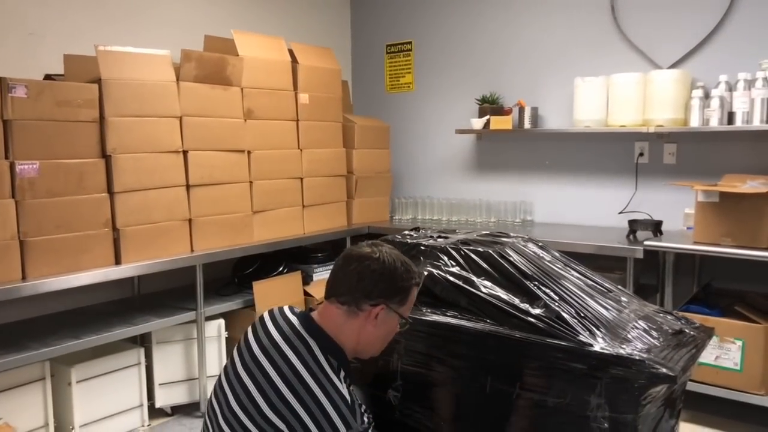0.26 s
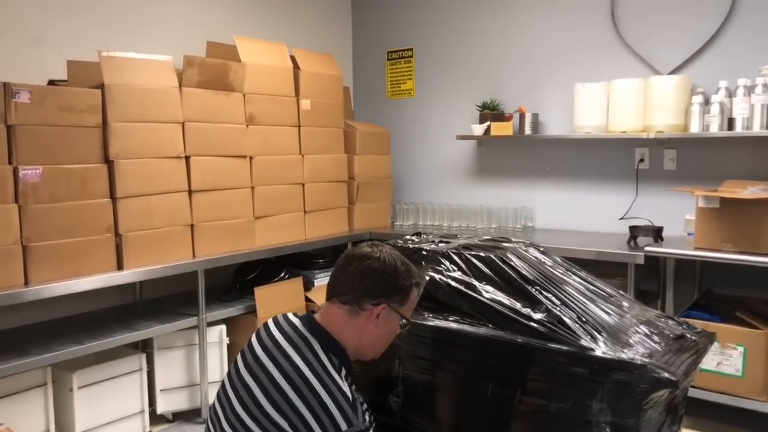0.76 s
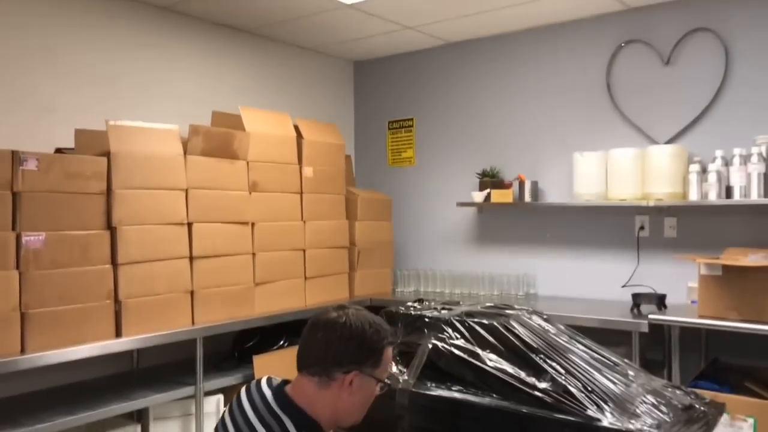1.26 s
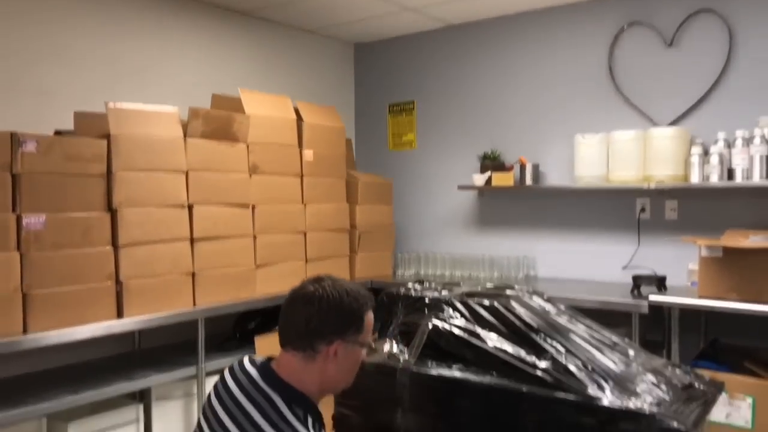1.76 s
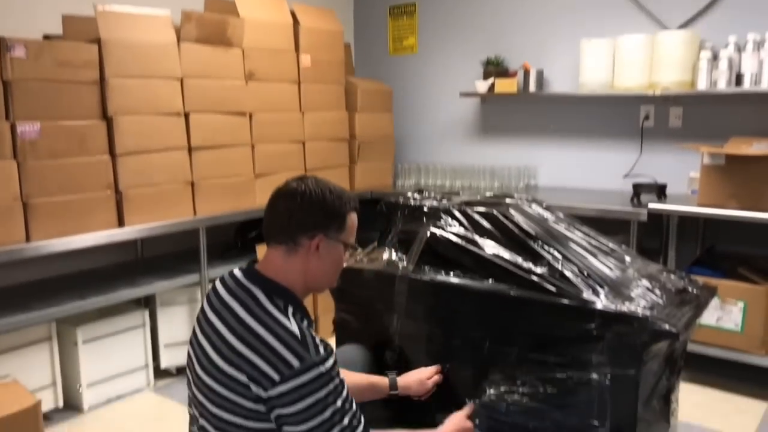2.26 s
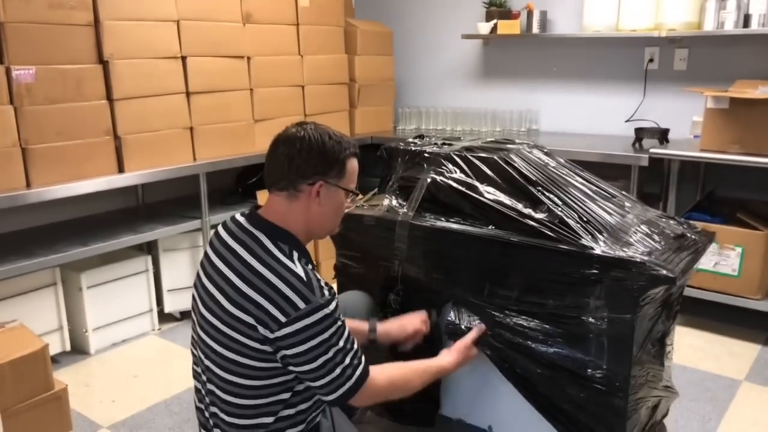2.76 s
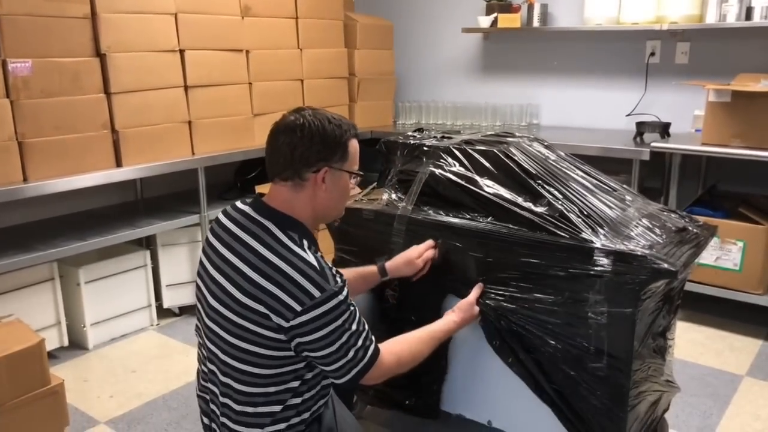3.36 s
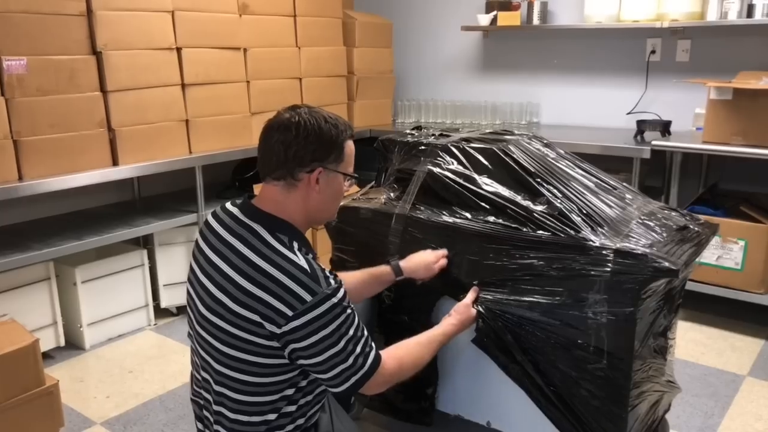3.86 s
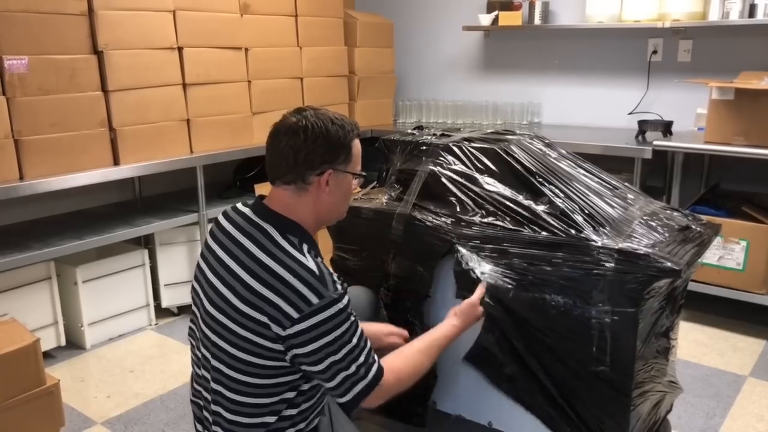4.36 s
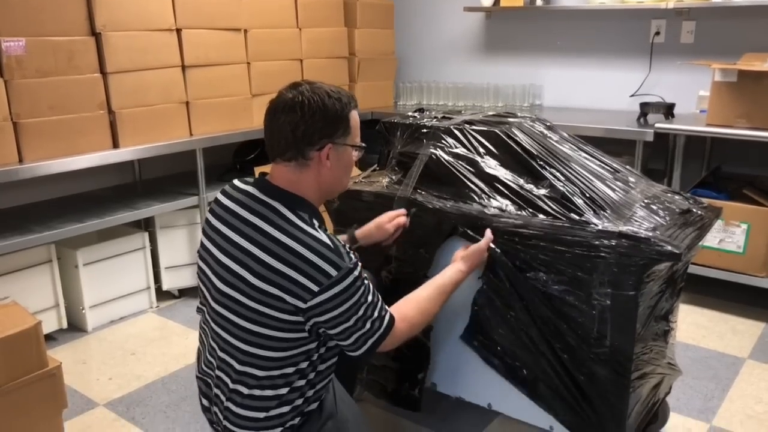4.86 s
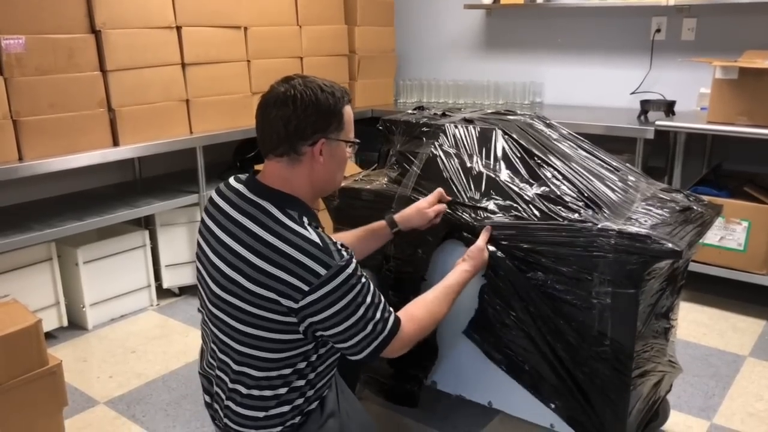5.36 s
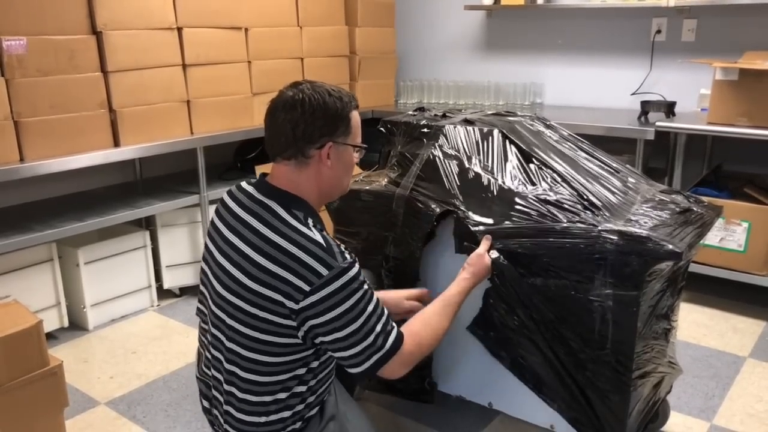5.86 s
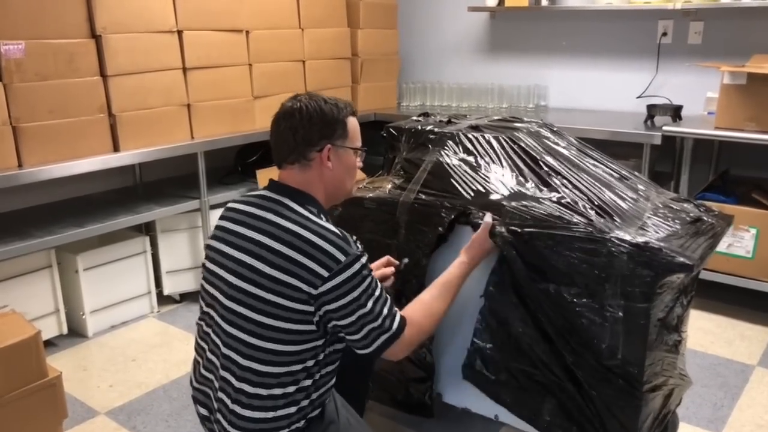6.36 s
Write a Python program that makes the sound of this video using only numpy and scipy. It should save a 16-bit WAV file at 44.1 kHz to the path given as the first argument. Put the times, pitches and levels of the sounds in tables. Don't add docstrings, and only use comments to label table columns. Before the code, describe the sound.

Taut plastic stretch wrap is pulled and torn by hand with sharp irregular snaps, dry crinkling and hollow knocks, over a low cooler hum.

```python
import sys
import numpy as np
from scipy import signal
from scipy.fft import rfft, irfft, next_fast_len
from scipy.io import wavfile
from scipy.ndimage import map_coordinates

SR = 44100
rng = np.random.default_rng(int(sys.argv[2]) if len(sys.argv) > 2 else 0)


def log_audio(samples):
    frames = np.atleast_2d(samples).T
    limited = np.clip(frames, -1, 1)
    pcm = np.round(limited * 32767).astype(np.int16)
    wavfile.write(sys.argv[1], SR, pcm)


def gain_from_db(level_db):
    decades = np.asarray(level_db, float) / 20
    return 10 ** decades


N = 291501

# t/s, peak level/dB, knock on load/dB, slap/dB
TAUT_SNAPS = [(0.362, -16.5, -19, -6.5), (0.4017, -11, -24, -12), (0.435, -7, -19.5, -9),
              (0.4398, -4.5, -20.5, -15), (0.471, -10.5, -17.5, -9), (0.486, -3.5, -15.5, -13.5),
              (0.5465, -9, -19, -13.5), (0.5624, -10.5, -15, -20), (0.6256, -8.5, -19.5, -15),
              (0.6557, -15, -35, -35), (0.9363, 3, -18, -15.5), (1.0195, -16, -27, -23.5),
              (2.4455, -17.5, -15.5, -13), (2.452, -17, -10, -12), (2.5105, -12.5, -9.5, -4.5),
              (2.561, -6.5, -16, -10.5), (2.5704, -12, -10.5, -12.5), (2.589, -8, -15, -14.5),
              (2.784, -16, -19.5, -15), (3.3721, -16, -19, -10), (4.2091, -9.5, -6.5, -14),
              (4.2211, -14.5, -10.5, -7.5), (4.7929, -4, -45, -17.5), (4.798, -15, -33, -18.5),
              (5.013, -12.5, -9, -6.5), (5.021, -29, -6.5, -18), (5.305, -19, -22, -9.5),
              (5.763, -13, -17, -16.5), (5.785, -11, -11.5, -26), (6.148, -16, -17, -6.5)]
# t/s, peak level/dB, knock on load/dB, slap/dB
SLACK_SLAPS = [(0.8897, -33, -8, -20.5), (1.612, -27, -10, -3.5), (1.86, -30, -0.5, -6),
               (1.9425, -24, -5, -18.5), (2.1245, -32, -6.5, -4.5), (2.417, -32.5, 5.85, -3),
               (2.4912, -9, -7, -2), (2.4991, -13, -6, -3.5), (2.727, -27, -9.5, -4),
               (2.5426, -20.5, -1, -13), (2.852, -24, -4.5, -3.5), (2.9, -20.5, -14.5, -24.5),
               (3.876, -29, -22.5, -0.5), (4.104, -21, 8, -3.5), (4.109, -31, 3.5, -10.5),
               (4.115, -20.5, -6, 0.5), (4.281, -31.5, 0, -10.5), (5.3448, -23.5, -10, -2),
               (6.101, -25, -13.5, 0.5)]
# t/s, peak level/dB, knock on load/dB
CREASE_TICKS = [(0.1132, -37.5, -14), (0.853, -38, -31), (0.82, -32, -36.5), (0.6184, -35.5, -28.5),
                (0.9231, -22.5, -31), (1.141, -34.5, -31), (1.2991, -36.5, -35.5), (1.318, -20, -48.5),
                (1.333, -21, -37.5), (1.4, -34.5, -26), (1.502, -35, -35), (1.641, -23, -19),
                (1.772, -20, -42), (1.835, -18.5, -38), (1.971, -25.5, -21), (1.996, -25.5, -27.5),
                (2.157, -22, -31), (2.302, -21.5, -11), (2.7102, -32.5, -31), (2.77, -23, -34),
                (3.361, -20, -14.5), (3.683, -27.5, -33), (3.749, -25, -24), (4.0698, -18, -11.5),
                (4.902, -22.5, -16), (4.9481, -17, -25), (5.157, -24, -17.5), (5.402, -18.5, -29),
                (5.67, -21.5, -10.5), (5.919, -16, -17.5)]
# t/s, peak level/dB, knock on load/dB
CLING_PEELS = [(0.692, -15, -15.5), (0.734, -17.5, -22.5), (1.2749, -23, -15.5), (1.485, -24.5, -36),
               (1.818, -25, -11), (2.255, -27, -20.5), (2.939, -19, -6.5), (3.2286, -25, -11.5),
               (3.264, -15, -43.5), (3.288, -15.5, -23), (4.174, -22, -5), (4.192, -12, -25.5),
               (4.616, -23.5, -23), (4.7451, -16.5, -24.5), (5.1253, -20, -8.5), (5.487, -21, -19.5),
               (5.62, -37, -21), (5.745, -13, -7.5), (5.7553, -18.5, -31.5), (5.866, -14.5, -18),
               (6.0809, -17.5, -10.5), (6.52, -16.5, -20.5), (6.567, -18, -23.5)]


def releases():
    events = [(*row, 0.002514) for row in TAUT_SNAPS]
    events += [(*row, 0.00267) for row in SLACK_SLAPS]
    for rows, base_slap_db, length_s in (CREASE_TICKS, -12.5, 0.00255), (CLING_PEELS, -14, 0.0086):
        for t_s, peak_db, knock_db in rows:
            slap_db = base_slap_db + 0.17 * (knock_db + 23)
            events.append((t_s, peak_db, knock_db, slap_db, length_s))
    return events


# f/Hz, level/dB per Hz
CREASE_COLOUR = [(1500, -27), (2800, -3.5), (4500, -1.5), (6500, -4), (8000, -21.5), (11000, -42)]
FOLD_COLOUR = [(500, -18.5), (1100, -2.5), (2000, 1.5), (2800, -3), (5000, -23.5)]
EDGE_COLOUR = [(5000, -10), (7500, -1.5), (10000, -8.5), (13000, -17), (15800, -48.5), (16500, -38.5)]
# f/Hz, width/Hz, level/dB
FREE_LOAD = [(195, 107, -3), (416.8, 50.2, 4.5), (613.2, 59.7, 5), (798.2, 143, 2.5), (1100, 650, -8)]
# f/Hz, width/Hz, level/dB
WRAPPED_LOAD = [(390, 89, -0.5), (804, 124, 1), (1019, 135, 0), (1630, 90, -22)]


def snaps():
    trains = np.zeros((4, N + SR))
    t = np.arange(SR // 16) / SR
    for start_s, peak_db, knock_db, slap_db, length_s in releases():
        edge_db = -17.5 - 0.273 * (peak_db + 20) - 0.059 * (knock_db + 20.5) - 0.198 * (slap_db + 7.5)
        rise_s = 0.0001 + 30 * length_s ** 2
        peak_db -= 8 * np.log10(length_s / 0.00255 + 0.67)
        spikes = gain_from_db(2.906 * rng.standard_normal(len(t) // 16 + 1)).repeat(16)[:len(t)]
        decay = np.exp(-(t / (length_s + 0.000099)) ** 0.948)
        shape = gain_from_db(peak_db) * decay * (1 - np.exp(-t / rise_s)) * spikes
        levels = gain_from_db([[0], [slap_db], [edge_db], [knock_db]])
        first = round(start_s * SR)
        trains[:, first:first + len(t)] += levels * shape * rng.standard_normal((4, len(t)))
    rip, slap, edge, blow = trains[:, :N]
    film = gain_from_db(-10.0) * coloured(rip, CREASE_COLOUR)
    film += gain_from_db(-1.48) * coloured(slap, FOLD_COLOUR)
    film += gain_from_db(2.0) * coloured(edge, EDGE_COLOUR)
    opened_s = 1.2
    wrapped = np.arange(N) < opened_s * SR
    free_knocks = gain_from_db(2.0) * hollow(blow * ~wrapped, FREE_LOAD)
    wrapped_knocks = gain_from_db(3) * hollow(blow * wrapped, WRAPPED_LOAD)
    return film + free_knocks + wrapped_knocks


# t/s, peak level/dB, f/Hz, t60/s
BUMPS = [(0.937, -32.5, 185.7, 0.2), (1.945, -29, 170.3, 0.075), (2.492, -29.5, 249, 0.084),
         (2.936, -32.5, 153.2, 0.095), (3.225, -28.5, 136, 0.0535), (4.106, -28.5, 405, 0.139),
         (4.259, -28, 149.6, 0.077), (5.012, -33, 179, 0.107), (5.752, -39.5, 241, 0.097),
         (5.775, -32.5, 150, 0.126), (6.088, -47.5, 213, 0.13), (6.446, -26, 226.7, 0.045)]


def thuds():
    out = np.zeros(N + SR)
    t = np.arange(SR // 2) / SR
    for start_s, peak_db, hz, t60_s in BUMPS:
        envelope = gain_from_db(peak_db - 60 * t / t60_s) * (1 - np.exp(-t / 0.0042))
        first = round(start_s * SR)
        out[first:first + len(t)] += envelope * np.sin(2 * np.pi * hz * t)
    return out[:N]


# t/s, crinkle level/dB
SHIFTING = [(0.0, -52), (0.07, -66), (0.34, -56.5), (1.2, -61), (1.62, -51.5), (1.82, -42.5), (2.08, -54.5),
            (2.45, -55), (2.95, -48), (3.2, -51), (3.72, -55.5), (4.1, -56), (4.4, -42.5), (4.6, -47),
            (4.95, -46), (5.42, -43), (5.62, -48), (6.61, -47.5)]
# t/s, drumming over crinkle/dB
LOAD_CONTACT = [(0, -5.5), (1.0, -10), (1.8, -7), (2.4, -8.5), (2.9, -4), (3.6, -12.5), (4.05, 6),
                (4.5, -9.5), (5.2, -8), (5.62, 2), (5.95, -15.5), (6.61, -15)]
# t of peak/s, crinkle level/dB, 10 dB fall/s (sign unused), drumming over crinkle/dB
HAND_TUGS = [(0.47, -47, -0.0243, 6.5), (0.69, -41.5, 0.0025, 1.05), (0.78, -49.5, 0.02, -27.5),
             (1.3, -43.5, 0.0764, -10), (1.335, -44.5, 0.09, -12), (1.49, -45, 0.05, -10),
             (2.41, -52.5, -0.03, 14), (2.57, -36, 0.1028, -19), (2.9, -47.5, 0.34, -11),
             (3.02, -48, 0.1254, -2.5), (3.29, -36.5, 0.0419, -10), (3.39, -42.5, 0.21, -8),
             (3.77, -50.5, -2.92, -8.5), (3.95, -48.5, 0.13, 7), (4.05, -55, 0.41, 12),
             (4.17, -46, 0.06, 11.5), (4.21, -36.5, 0.2777, -10.5), (4.63, -43.5, 0.29, -5),
             (4.72, -44.5, 0.17, -8.5), (5.17, -34.5, 0.0126, -5.5), (5.3, -42.5, 0.08, -0.5),
             (5.6, -52, -3.08, 4.5), (5.73, -49.5, -1.5, 0.5), (5.765, -31, 0.0559, 2.5),
             (5.87, -39.5, 0.2361, -11.5), (5.97, -48.5, 15.37, -18), (6.085, -38.5, -0.0936, -6),
             (6.155, -37, -0.02, -3.5), (6.37, -40.5, 0.1, -1), (6.56, -38, 10.72, -9)]
# t/s, crinkle level/dB, 10 dB fall/s (sign unused), drumming over crinkle/dB
SPRING_BACKS = [(0.37, -59, -0.87, -6.5), (0.553, -39, 0.0539, 2), (0.632, -39, 0.11, -15.5),
                (0.943, -31.5, 0.0657, -5.5), (1.62, -46.5, 0.386, -8.5), (2.13, -62.5, -3.75, -11.5),
                (2.262, -49, 0.3835, 6), (2.495, -37.5, 0.0419, 6), (2.78, -41, 0.2437, -6.5),
                (3.875, -44.5, 0.13, -1.5), (4.11, -46, 0.0845, 12.5), (4.803, -39, 0.0255, -2),
                (5.017, -41, 0.5165, -6)]


def handling():
    t = np.arange(N) / SR
    body = gain_from_db(2 * np.interp(t, *np.transpose(SHIFTING)))
    drum = body * gain_from_db(2 * np.interp(t, *np.transpose(LOAD_CONTACT)))
    for rows, rise_s in (HAND_TUGS, 0.0448), (SPRING_BACKS, 0.0084):
        for peak_s, level_db, fall_s, drum_db in rows:
            slope = np.maximum((peak_s - t) / rise_s, (t - peak_s) / abs(fall_s))
            power = gain_from_db(2 * level_db - 20 * slope)
            body = body + power
            drum = drum + power * gain_from_db(2 * drum_db)
    return 10 * np.log10(body), 10 * np.log10(drum)


# f/Hz, level/dB per Hz
DRUM_COLOUR = [(100, -54.5), (200, 0), (400, -5), (800, -3), (1200, 0), (2000, -21)]


def crinkle():
    body_db, drum_db = handling()
    fold_db = body_db - 2 + 0.36 * (drum_db - body_db)
    fizz_db = body_db - 5 + 0.237 * (body_db + 49)
    surge = gain_from_db(1.1 * wobble(30))
    small = surge * creases(per_s=420, spread_db=2.0, life_s=0.00227)
    large = surge * creases(per_s=160, spread_db=1.5, life_s=0.0082)
    noise = rng.standard_normal((5, N))
    body = coloured(gain_from_db(body_db - 1.5) * unit(small + 0.38 * large) * noise[0], CREASE_COLOUR)
    fizz = coloured(gain_from_db(fizz_db + 0.5) * unit(small + 1.0 * large) * noise[1], EDGE_COLOUR)
    folds = coloured(gain_from_db(fold_db - 1.0) * unit(small + 2.8 * large) * noise[4], FOLD_COLOUR)
    drum = coloured(gain_from_db(drum_db - 6.0) * large * noise[2], DRUM_COLOUR)
    ring = hollow(gain_from_db(drum_db - 5.5) * large * noise[3], FREE_LOAD)
    return body + fizz + folds + drum + ring


# f/Hz, t60/s
WALL_T60 = [(150, 0.594), (600, 0.34), (3000, 0.251), (10000, 0.355)]


def room(x, count=6):
    hz, t, z = signal.stft(rng.standard_normal((count, SR // 2)), SR, nperseg=256)
    decay = gain_from_db(-60 * t / along(WALL_T60, hz)[:, None])
    tails = signal.istft(z * decay, SR, nperseg=256)[1]
    tail_s = np.arange(tails.shape[1]) / SR
    tails *= 1 + 0.213 * gain_from_db(-60 * tail_s / 0.234)
    turn = np.arange(N) * 30 // SR % count
    wet = np.zeros(N)
    for k, tail in enumerate(tails):
        wet += signal.fftconvolve(x * (turn == k), tail / np.linalg.norm(tail))[:N]
    delay_s = 0.002
    return np.pad(wet, (round(delay_s * SR), 0))[:N]


# f/Hz, level/dB rms
COMPRESSOR = [(58.5, -50.5), (117, -78), (192, -63.5)]
# f/Hz, level/dB per Hz
AIR_COLOUR = [(25, -44), (45, -17.5), (70, -5.5), (95, -13.5), (125, 1), (150, -4), (195, -9.5), (260, -17),
              (900, -51.5), (5000, -39), (16000, -70)]


def cooler():
    t = np.arange(N) / SR
    lines = np.zeros(N)
    for hz, rms_db in COMPRESSOR:
        level = np.sqrt(2) * gain_from_db(rms_db + 0.39 * wobble(11))
        lines += level * np.sin(2 * np.pi * hz * t + 1.28 * wobble(5))
    air = gain_from_db(-51.5 + 0.81 * wobble(5.04)) * coloured(rng.standard_normal(N), AIR_COLOUR)
    return lines + air


def unit(x):
    return x / np.sqrt(np.mean(x ** 2) + 1e-20)


def along(points, hz):
    f, v = np.transpose(points)
    return np.interp(np.log(hz + 1), np.log(f + 1), v)


def wobble(rate_hz):
    knots = rng.standard_normal(int(N * rate_hz / SR) + 4)
    return map_coordinates(knots, [np.arange(N) * rate_hz / SR])


def coloured(x, spectrum):
    gain = gain_from_db(along(spectrum, np.fft.rfftfreq(8192, 1 / SR))) + 1e-6
    cepstrum = irfft(np.log(gain))
    cepstrum[1:4096] *= 2
    cepstrum[4097:] = 0
    pulse = irfft(np.exp(rfft(cepstrum)))
    return signal.fftconvolve(x, pulse / np.linalg.norm(pulse))[:N]


def hollow(x, peaks):
    size = next_fast_len(N + SR // 2)
    f = np.fft.rfftfreq(size, 1 / SR)
    modes = np.zeros(len(f), complex)
    for k, (hz, width_hz, db) in enumerate(peaks):
        damping = 1j * f * width_hz
        modes += (-1) ** k * gain_from_db(db) * damping / (hz * hz - f * f + damping)
    return irfft(rfft(x, size) * modes, size)[:N] / np.sqrt(np.mean(abs(modes) ** 2))


def creases(per_s, spread_db, life_s):
    chance = rng.random(N)
    size = np.minimum(rng.exponential(size=N), 3)
    starts = (chance < per_s / SR) * gain_from_db(2 * spread_db * size)
    power = signal.lfilter([1], [1, -np.exp(-1 / (life_s * SR))], starts)
    return unit(np.sqrt(abs(power)))


def scene():
    near = snaps() + thuds()
    loose = crinkle()
    echoes = room(gain_from_db(-6.5) * near + gain_from_db(-5.5) * loose)
    mix = near + gain_from_db(0.5) * loose + echoes + cooler()
    return np.array([mix, mix])


def band_limit(x):
    return signal.sosfilt(signal.butter(12, 15960, fs=SR, output="sos"), x)


def record(dry):
    return band_limit(dry)


dry = scene()
out = record(dry)
log_audio(out)
```